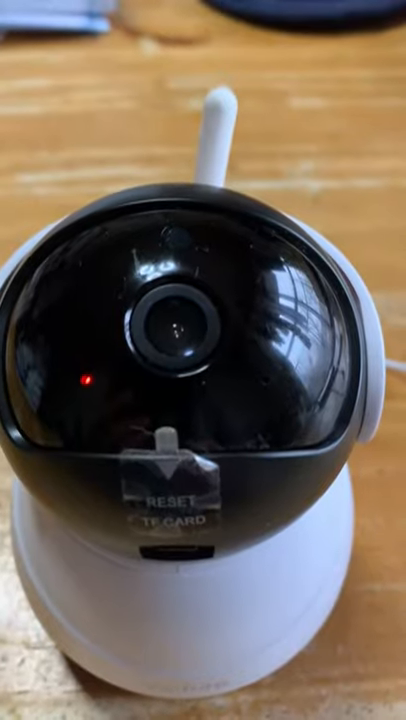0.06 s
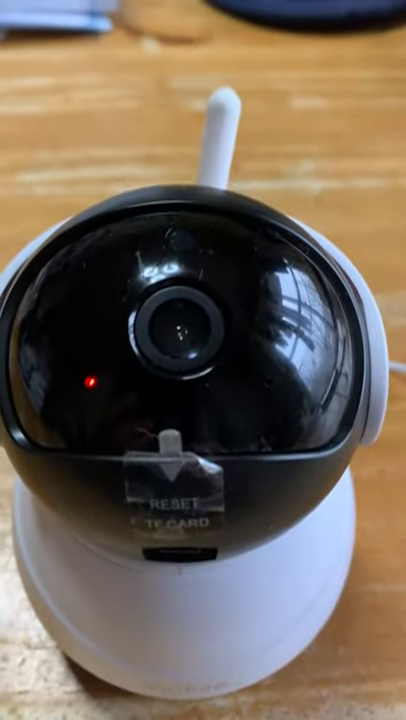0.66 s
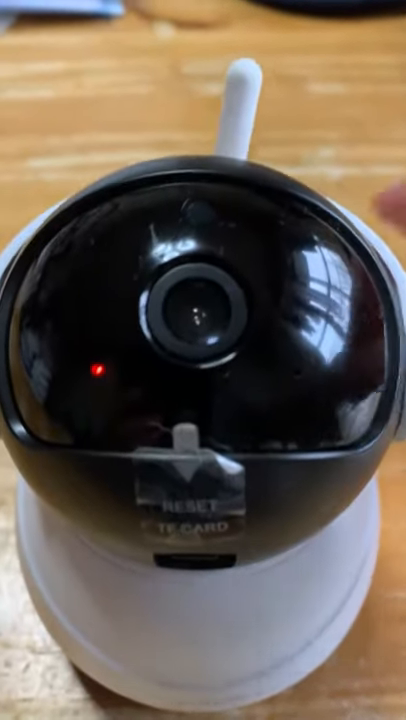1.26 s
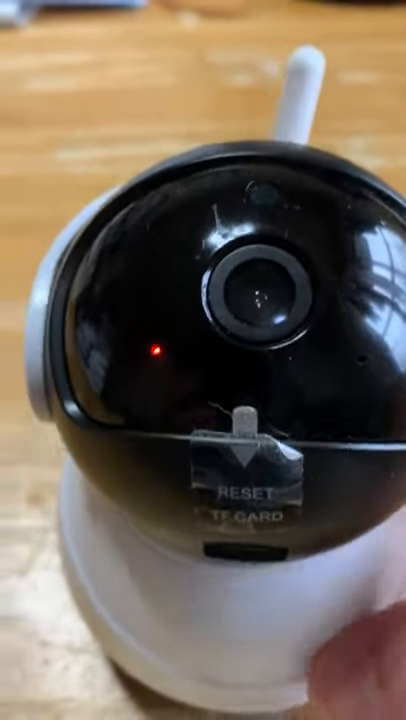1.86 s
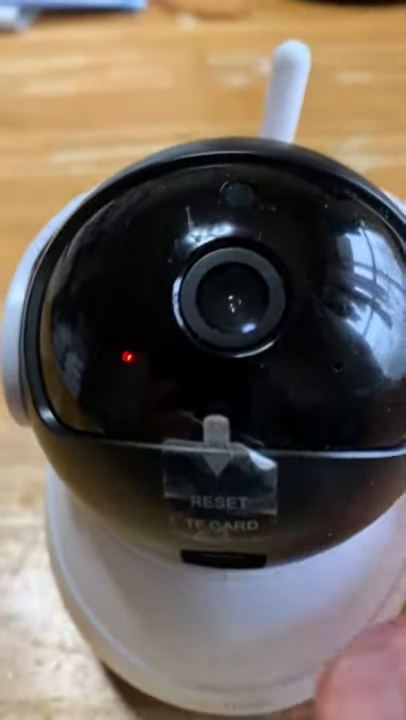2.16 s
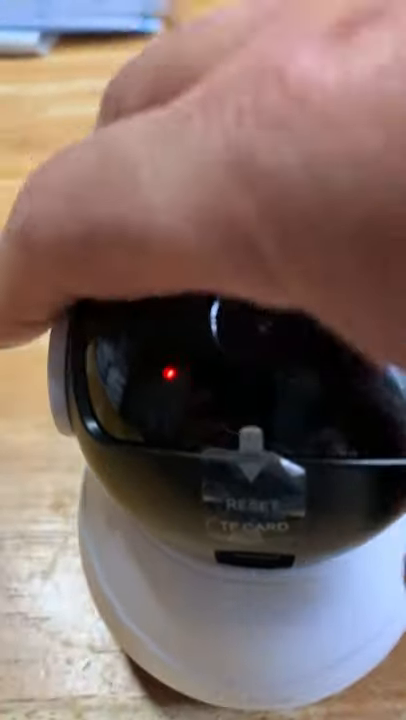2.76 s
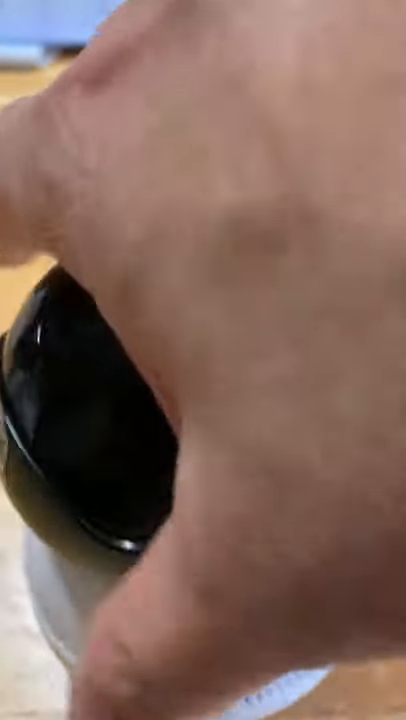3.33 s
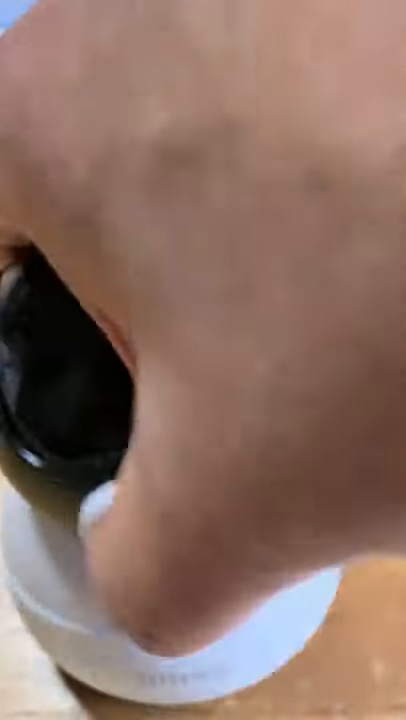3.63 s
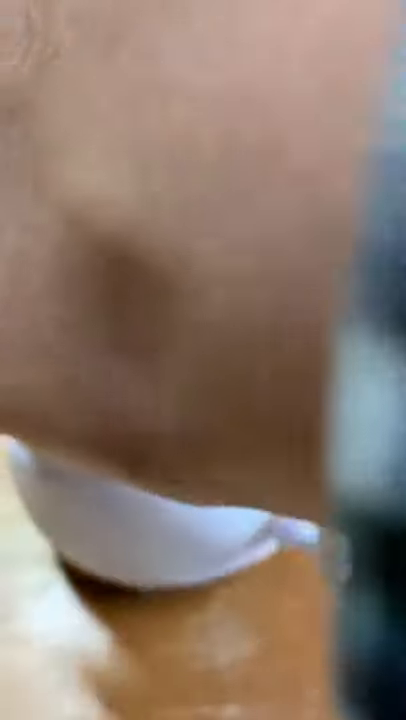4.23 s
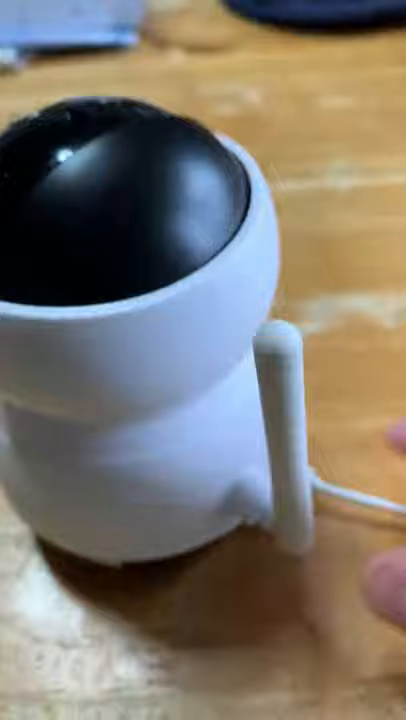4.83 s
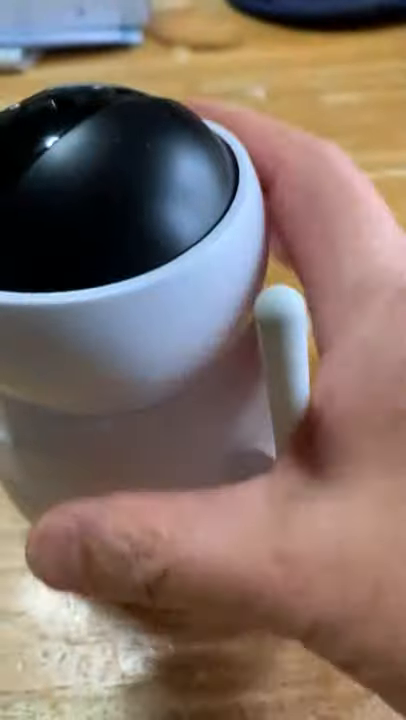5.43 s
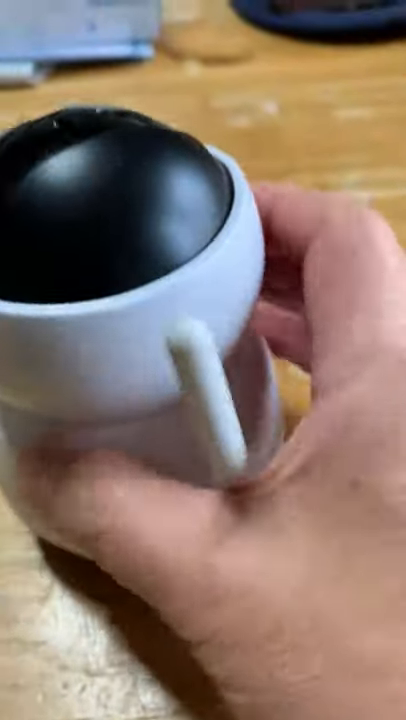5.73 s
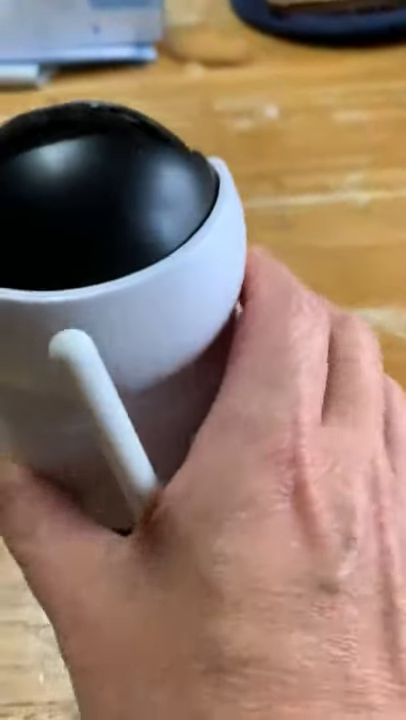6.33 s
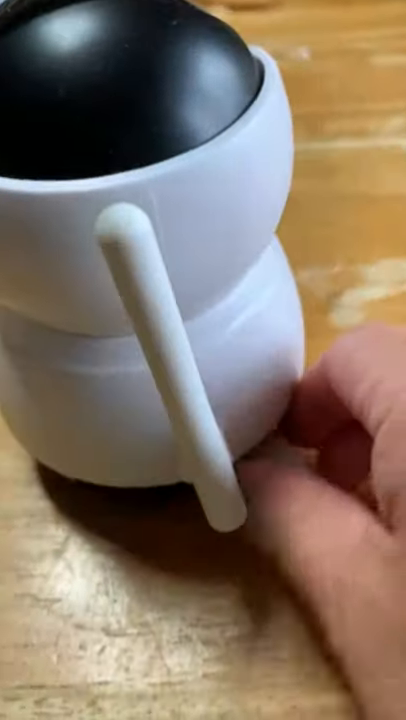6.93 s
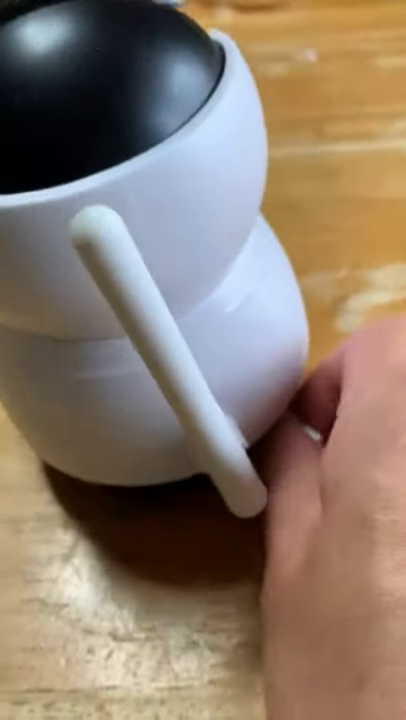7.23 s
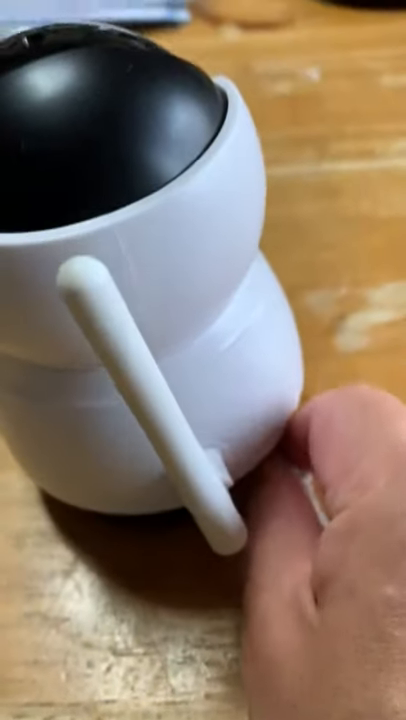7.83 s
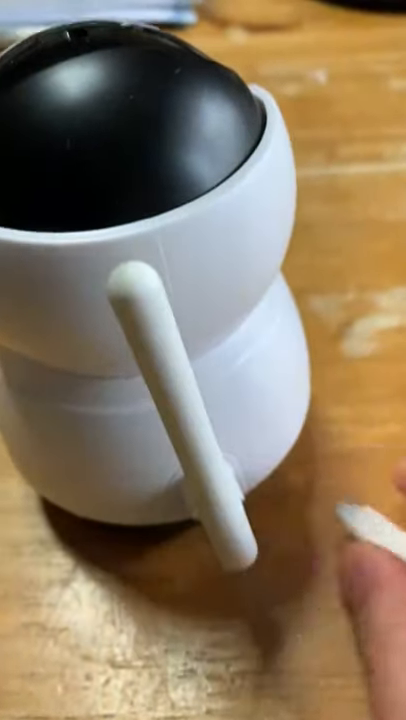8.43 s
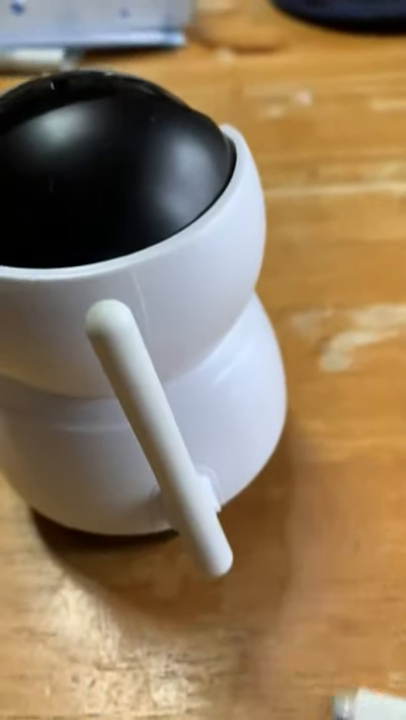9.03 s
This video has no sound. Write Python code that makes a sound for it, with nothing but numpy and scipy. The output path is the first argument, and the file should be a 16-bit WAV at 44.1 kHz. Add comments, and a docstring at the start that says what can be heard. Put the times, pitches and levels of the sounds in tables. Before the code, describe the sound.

In a quiet room, a hand turns a small plastic camera on a wooden table. Fingers rub and tap the hollow housing, which gives short scrapes and bright clicks, while its base knocks and thuds lightly on the wood. Near the end the cable plug is worked loose in a quick run of ticks and comes out with a sharp click, followed by one light tap. The microphone is close.

```python
"""Handling and unplugging a small camera

A quiet room, a wooden table, a two-port microphone close in. A hand turns a small plastic camera:
its head rasps round, its base rocks on the wood, fingers rub and tap the hollow housing, and the
tabletop thuds. Then the cable plug is worked loose in a run of ticks and leaves with a sharp click."""
import sys
import numpy as np
from scipy import signal
from scipy.fft import rfft, irfft
from scipy.io import wavfile

SR = 44100
rng = np.random.default_rng(int(sys.argv[2]) if len(sys.argv) > 2 else 0)


def store_pcm(level_fs):
    """Save levels as 16-bit WAV."""
    pcm = np.round(np.clip(level_fs, -1, 1) * 32767).astype(np.int16)
    wavfile.write(sys.argv[1], SR, np.atleast_2d(pcm).T)


N = 405225

# the base rocking on the wood: start_s, knock_db, thud_db
BASE_KNOCKS = [(0.151, -85, -49.5), (0.3, -88, -52.5), (0.972, -62, -51), (1.991, -48.5, -42),
               (3.103, -49, -39), (3.1449, -23.5, -35), (3.1646, -28, -44.5), (3.4002, -37, -31.5),
               (3.466, -53.5, -42), (3.643, -50, -44), (3.8886, -39, -31.5), (4.013, -38, -41),
               (4.3271, -40.5, -41.5), (4.416, -57, -42), (5.334, -44.5, -36), (5.5857, -32, -36),
               (5.616, -41.5, -32), (5.6725, -43.5, -41.5), (5.7155, -45, -36.5), (5.795, -43, -41.5),
               (5.817, -54, -30), (5.838, -55, -46), (5.9834, -31.5, -28), (6.0374, -39.5, -49),
               (6.048, -44, -34.5), (6.074, -51, -37.5), (6.088, -47.5, -41), (6.1735, -45.5, -40.5),
               (6.387, -49.5, -46), (6.465, -43, -34), (6.88, -59, -44.5), (7.2355, -40.5, -44.5),
               (7.39, -58.5, -43), (7.488, -46.5, -38.5), (8.122, -38, -26), (8.238, -70, -43.5),
               (9.081, -64.5, -45.5)]
# hard plastic parts meeting, and faint fingertip touches on the shell: start_s, knock_db, click_db, snap_db,
# part_ring_hz, edge_ping_hz
PLASTIC_CLICKS = [(1.5664, -47, -53, -41.5, 4900, 6300), (1.6197, -46, -52, -44.5, 4950, 7170),
                  (2.953, -57.5, -75, -55, 2120, 7060), (2.994, -67, -70, -63, 2100, 7700),
                  (3.004, -49.5, -54.5, -53, 1390, 7360), (3.147, -34, -40.5, -59, 1510, 7300),
                  (3.166, -45, -47, -62, 1550, 6600), (3.243, -59, -66, -50.5, 2110, 7470),
                  (3.477, -67, -77, -73, 2100, 8150), (3.2015, -49, -53.5, -41.5, 5000, 7530),
                  (3.529, -51, -47, -46, 2100, 8250), (3.5489, -57, -41.5, -38, 4000, 13100),
                  (3.955, -41.5, -41, -43, 1360, 11900), (4.27, -56.5, -60, -62.5, 2190, 8000),
                  (4.302, -54.5, -65, -67, 3940, 7500), (4.378, -56.5, -61, -61, 2130, 7360),
                  (5.1855, -53, -50.5, -44, 5200, 7970), (5.312, -72, -59, -54, 3550, 7680),
                  (5.3597, -47, -45, -58, 2090, 6670), (5.382, -58, -58, -62, 2170, 6900),
                  (5.412, -56.5, -70, -58.5, 3500, 6900), (5.479, -53, -49, -53, 2050, 7860),
                  (5.516, -49, -47.5, -72, 2050, 6000), (5.588, -45, -44.5, -60, 3610, 7900),
                  (5.6101, -35.5, -37.5, -45, 2116, 5900), (5.9135, -57, -43.5, -44.5, 2090, 5950),
                  (6.033, -43, -62, -65, 2000, 11600), (6.058, -51, -55, -43.5, 2380, 7500),
                  (6.3343, -46, -61.5, -61, 1430, 7360), (6.4454, -42.5, -53, -56, 2125, 6160),
                  (6.5338, -72, -63, -57.5, 1520, 6360), (7.2366, -48.5, -52.5, -78, 1410, 6000),
                  (7.417, -54, -63, -87, 1550, 6000), (7.479, -57.5, -56.5, -68, 2640, 7900),
                  (8.1225, -34, -41, -41.5, 2110, 6130), (8.132, -33.5, -38.5, -44, 3100, 7740),
                  (8.1411, -39, -44.5, -45.5, 2100, 8300)]
# short slides of base, fingers and plug: start_s, end_s, knock_db, click_db, snap_db, ring_hz
SLIDES = [(1.565, 1.62, -45, -55, -51, 660), (1.618, 1.643, -43.5, -56.5, -48, 1070),
          (1.642, 1.667, -51, -56, -51.5, 1060), (1.661, 1.693, -60, -61, -64, 1060),
          (1.851, 1.886, -50.5, -65.5, -62.5, 996), (1.943, 1.948, -54, -58, -61, 2390),
          (2.118, 2.173, -70, -62.5, -53.5, 9600), (2.675, 2.695, -64.5, -72, -64, 2150),
          (3.125, 3.156, -56, -53.5, -53, 2170), (3.2, 3.211, -58, -54, -45, 7670),
          (3.235, 3.297, -53, -64, -57, 720), (5.479, 5.502, -54, -52, -57.5, 2080),
          (5.603, 5.614, -38, -40.5, -66, 874), (5.916, 5.932, -55.5, -47.5, -71, 2620),
          (5.981, 6.08, -48.5, -53.5, -55.5, 2030), (6.828, 6.85, -49, -51.5, -51, 1370),
          (6.85, 6.885, -63, -58, -49, 12500), (6.959, 7.03, -85, -57, -51, 6500),
          (6.973, 6.995, -64, -52, -42, 7520), (7.147, 7.188, -64, -57.5, -54.5, 6400),
          (7.475, 7.517, -49.5, -59, -59.5, 960), (7.529, 7.708, -60, -67.5, -70, 1000),
          (7.733, 8.007, -65, -78, -97, 1710), (8.093, 8.12, -54, -54, -54, 2290),
          (8.111, 8.116, -29.5, -36, -42, 610), (8.126, 8.136, -34, -36, -44, 2154),
          (8.319, 8.467, -70.5, -64, -64, 1700), (9.051, 9.094, -55.5, -64.5, -89, 1523)]
# dry skin or a plastic edge dragging: start_s, end_s, level_db, pitch_hz
DRAG_SQUEAKS = [(1.569, 1.6, -46.5, 5930), (1.572, 1.598, -53, 7200), (1.564, 1.665, -62, 12800),
                (1.617, 1.628, -49, 6100), (1.646, 1.671, -46.5, 5630), (1.66, 1.668, -44, 7200),
                (3.133, 3.147, -45, 7150), (6.975, 6.987, -34, 7200), (6.987, 7, -44, 6680),
                (7.15, 7.185, -57, 7300)]
# the hand bumping the shell: start_s, level_db, pitch_hz
HAND_BUMPS = [(1.639, -46, 240), (4.167, -46.5, 190), (6.876, -44, 282), (8.122, -37.5, 247)]
# the plug working loose: start_s, knock_db, click_db, snap_db, knock_hz, click_hz, slip_s
PLUG_SLIPS = [(7.595, -42.5, -45, -46.5, 970, 2340, 0.0038), (7.6307, -42.5, -60.5, -70, 975, 1550, 0.002),
              (7.6366, -43.5, -44, -59, 633, 1570, 0.0043), (7.666, -42.5, -46.5, -52, 991, 1770, .004),
              (7.733, -40.5, -45, -46, 976, 1380, 0.0025), (7.7617, -41, -46.5, -54.5, 695, 1580, 0.0017),
              (7.8097, -42, -43, -51.5, 617, 1500, 0.0019), (7.8389, -41.5, -45, -52.5, 553, 1670, 0.0023),
              (7.8631, -41, -43.5, -50.5, 575, 1830, 0.0014),
              (7.902, -43.5, -41.5, -53.5, 613, 1760, 0.00065),
              (7.9464, -41, -43, -47.5, 587, 1860, 0.0011), (7.998, -41, -42, -47, 990, 1666, 0.00055)]
# the loose cable and its plug tapping: start_s, level_db, pitch_hz, top_hz
LOOSE_CABLE_TAPS = [(4.977, -45.5, 3830, 5200), (8.597, -39, 1620, 4040)]
# the hand holding and turning the housing: start_s, end_s, relative_db
HAND_TURNS = [(1.83, 2.17, -67), (2.68, 2.98, -68), (3.0, 3.37, -57), (3.42, 4.05, -62), (4.08, 4.45, -64),
              (5.15, 5.46, -62), (5.49, 5.84, -59), (5.93, 6.16, -63), (6.24, 6.5, -56.5),
              (6.55, 7.44, -64.5), (7.48, 8.05, -66.5), (8.2, 8.55, -64)]
# skin swiping the plastic: start_s, end_s, relative_hiss_db, relative_sheen_db, sheen_hz
SKIN_SWIPES = [(0.49, 0.53, -79.5, -92, 6500), (1.84, 1.994, -67.5, -85, 8950),
               (1.993, 2.161, -62.5, -64, 10700), (2.48, 2.524, -78, -82, 8500),
               (2.664, 2.767, -64.5, -64.5, 9700), (2.76, 2.808, -64.5, -59.5, 12000),
               (2.815, 2.907, -62, -62, 10300), (2.922, 3.14, -61, -71, 9700),
               (3.173, 3.344, -66, -68, 9450), (3.56, 3.62, -65.5, -81, 12200),
               (3.629, 3.715, -66, -71, 9500), (3.731, 3.93, -100.5, -72, 6760),
               (3.972, 4.053, -76, -64, 8400), (4.079, 4.24, -71.5, -58.5, 8460),
               (4.114, 4.19, -74, -64, 11200), (4.303, 4.418, -70, -73, 8600),
               (5.144, 5.263, -66.5, -80, 10000), (5.515, 5.587, -59, -60.5, 10400),
               (5.717, 5.799, -54, -58, 12100), (5.95, 6.042, -54, -55.5, 11100),
               (6.101, 6.178, -71, -69.5, 7740), (6.226, 6.327, -61.5, -65, 10400),
               (6.378, 6.452, -65, -67, 9700), (6.524, 6.593, -65, -63, 11000),
               (6.748, 6.772, -62, -63, 6860), (7.025, 7.094, -66, -69, 7650),
               (7.239, 7.445, -68.5, -64, 11100), (7.515, 7.554, -60, -80, 9000),
               (8.176, 8.227, -68, -64.5, 6130), (8.276, 8.472, -64.5, -67.5, 9900),
               (9.068, 9.102, -77, -79, 8300)]
# the echo off the cupped palm, its delay following the gap: time_s, delay_s
PALM_DELAYS = [(1.9, 0.0005), (2.7, 0.00049), (3.05, 0.0005), (3.8, 0.00053), (4.2, 0.00051),
               (5.5, 0.00048), (6.3, 0.000489), (7.3, 0.00048), (8.4, 0.0006)]

# modes of the hollow housing and its base: pitch_hz, relative_db, t60_s
HOUSING_MODES = [(279.3, -11, 0.18), (344.6, -14, 0.12), (572.7, -5.5, 0.074), (610.4, 4.5, 0.039),
                 (711.6, -4, 0.068), (846, -12, 0.061), (933, -4.5, 0.045), (1047, -5.5, 0.042),
                 (1221, -10, 0.05), (1473, -4.5, 0.027), (1670, -8, 0.0081), (2050, -9, 0.045),
                 (2200, -8, 0.035), (2412, -7, 0.025), (2660, -11.5, 0.039), (3107, -6, 0.027),
                 (3840, -10.5, 0.018), (4540, 8, 0.0051), (5390, -4, 0.015), (5804, -5, 0.025),
                 (6130, -2.5, 0.016), (7080, 2.5, 0.012), (7470, 0, 0.023), (7990, -0.5, 0.014),
                 (9180, -14, 0.0077), (12200, -17.5, .01), (12500, -12.5, 0.018)]
# modes of the tabletop: pitch_hz, relative_db, t60_s
TABLETOP_MODES = [(45.3, -23, 0.56), (81.8, -4, 0.18), (90.8, -2, 0.15), (137, 0, 0.067),
                  (193, -8.5, 0.078), (275.2, -18.5, .12)]
# modes of the socket and base: pitch_hz, relative_db, t60_s
SOCKET_MODES = [(330, -9, 0.03), (594, 2, 0.052), (645, -3.5, .04), (883, -11.5, 0.042), (2072, -9.5, .05),
                (2150, -11.5, 0.045), (2470, -12.5, .04), (3090, -13.5, 0.04), (4330, -8, 0.031),
                (6160, -23.5, 0.09)]
# the housing's knock, click and snap bands, a row each: low_hz, high_hz
HOUSING_BANDS = [(280, 1700), (1450, 5000), (5000, 13000)]
# a soft contact loses its highs: click_minus_knock_db, knock_top_hz
CONTACT_SOFTNESS = [(-24, 1400), (-18.5, 1430), (-2, 2770), (20, 5100)]
# spectrum of the rubbed housing: frequency_hz, relative_db
RUB_SPECTRUM = [(150, -2), (280, 0), (420, -6), (620, 0), (820, -2), (1020, -1), (1700, -13.5), (1900, -13),
                (2170, -13), (2500, -13), (4000, -16), (6000, -45.5)]
# spectrum of sliding skin: frequency_hz, relative_db
HISS_SPECTRUM = [(1500, -13.5), (2200, 0), (2900, 0.5), (3900, -3.5), (4700, 2), (6000, 2.5), (7500, 6.5),
                 (9000, 0.5), (10500, -16.5), (13000, -42.5)]
# spectrum of the skin's finest grain, for a sheen_hz of 9900: frequency_hz, relative_db
SHEEN_SPECTRUM = [(6000, -23), (9000, 4.5), (10400, 2.5), (11800, -15), (14500, -32)]
# spectrum of the quiet room: frequency_hz, relative_db
ROOM_SPECTRUM = [(20, -54), (27, -31), (34, -9), (45, -5.5), (85, -1.5), (130, -8.5), (250, -16),
                 (400, -28.5), (600, -28), (900, -23.5), (1400, -26.5), (1750, -35.5), (2000, -33),
                 (2600, -45), (4000, -42), (4900, -46.5), (6000, -46), (8000, -46), (12000, -64)]
# how alike diffuse sound is at the two ports: frequency_hz, correlation
PORT_LIKENESS = [(60, 0.99), (250, 0.59), (630, 0), (1400, 0.7), (3000, 0), (6500, 1), (14000, 0.3)]
# the microphone's left port against its right: frequency_hz, left_lead_rad, left_minus_right_db
PORT_RESPONSE = [(30, -0.5, 1.5), (100, 0.29, -1.5), (513, 0.68, -2), (1030, 0.81, -1.5), (2230, 1, -2.5),
                 (3890, 1, -1), (4540, 2.5, -4), (4720, 4, -5), (6700, 6, 2), (7700, 5.5, -0.5),
                 (10630, 8.5, 0), (14900, 5.5, -0.5)]

SWIPE_ATTACK_S, SWIPE_RELEASE_S = 0.032, 0.036


def base_knocks(rim_hz=897, rim_scatter=0.15, top_hz=2400):
    """The base drops on the wood: a rap of its rim, never quite at one pitch, a dull knock and a thud."""
    out = np.zeros(N)
    wave = from_db(-5.5) * table_wave(start_hz=2882, spread_s=0.004656, t60=0.11)
    for start, knock_db, thud_db in BASE_KNOCKS:
        rap_hz = rim_hz * np.exp(rim_scatter * rng.standard_normal())
        rap = from_db(-10.5) * local_ring(rap_hz, t60=0.015, build_cycles=1.3)
        add(out, start, contact(thud_db, knock_db, knock_db - 22, knock_db - 40, wave + rap, ring=wave))
    return low_pass(out, top_hz)


def plastic_clicks(thud_over_knock_db=2.5):
    """Plastic meets plastic, or a fingertip touches the shell: bright clicks that shake the table in step with
    their knock."""
    out = np.zeros(N)
    wave = from_db(-8) * table_wave(start_hz=2950, spread_s=0.00448, t60=0.16)
    for start, knock_db, click_db, snap_db, ring_hz, ping_hz in PLASTIC_CLICKS:
        ring = from_db(-7.5) * local_ring(ring_hz, t60=0.019, build_cycles=3.4)
        ping = from_db(-6) * local_ring(ping_hz, t60=0.014, build_cycles=9.6)
        thud_db = knock_db + thud_over_knock_db
        add(out, start, contact(thud_db, knock_db, click_db, snap_db, wave, ring, ping))
    return out


def plug_ticks(thud_over_knock_db=4.5):
    """The plug sticks and slips: each slip lets go with a tick and ends in a softer catch."""
    out = np.zeros(N)
    wave = from_db(-0.5) * table_wave(start_hz=2424, spread_s=0.00551, t60=0.062)
    upper_bands = (HOUSING_BANDS[1][0], HOUSING_BANDS[2][1])
    for start, knock_db, click_db, snap_db, knock_hz, click_hz, slip_s in PLUG_SLIPS:
        body = wave + from_db(-2.5) * local_ring(knock_hz, t60=0.027, build_cycles=2.1)
        ring = wave + from_db(-2.5) * local_ring(click_hz, t60=0.0097, build_cycles=1.0)
        add(out, start, contact(knock_db + thud_over_knock_db, knock_db, click_db, snap_db, body, ring))
        catch = unit_blow(band(housing_answer(), upper_bands))
        add(out, start + slip_s, from_db(click_db - 5) * catch)
    return out


def unplug(start_s=8.1185):
    """The plug comes free with a dry crack, the latch whips and the socket springs back, ringing."""
    out, t = np.zeros(N), np.arange(SR // 4) / SR
    crack = band(rng.standard_normal(len(t)) * decay(t, t60=0.02), [2800, 9500])
    latch = local_ring(hz=2420, t60=0.006, build_cycles=2.7)
    socket = ringing(SOCKET_MODES, t, scatter_db=0.5, build_cycles=1.0)
    add(out, start_s, from_db(-30) * unit_blow(crack))
    add(out, start_s, from_db(-24.5) * latch)
    add(out, start_s, from_db(-22.5) * unit_blow(socket))
    return out


def scrapes(judder_db=1.0, swell_power=0.085):
    """A slide is a juddering run of slips into the housing and the rubbed spot, swelling and easing."""
    out = np.zeros(N)
    for start, end, *levels_db, ring_hz in SLIDES:
        size = max(round((end - start) * SR), 100)
        catches = slips(SR // 2, per_s=1500, uneven_db=3.0)
        catches *= from_db(-judder_db * drift(per_s=220, size=SR // 2))
        answer = unit_blow(housing_answer())
        spot = from_db(-8.5) * local_ring(ring_hz, t60=0.017, build_cycles=0.86)
        rasp = signal.fftconvolve(catches[:size] * np.hanning(size) ** swell_power, answer + spot)
        for edges, db in zip(HOUSING_BANDS, levels_db):
            part = band(band(rasp, edges), edges)
            mean_power = (np.sum(part ** 2) + 1e-20) / size
            add(out, start, from_db(db) * part / np.sqrt(mean_power))
    return out


def squeaks(edge_ratio=1.11):
    """Quick, uneven slips keep one high resonance ringing."""
    out = np.zeros(N)
    for start, end, db, hz in DRAG_SQUEAKS:
        gain = stroke(end - start, attack_s=0.0015, release_s=0.0047)
        grain = band(slips(SR // 2, per_s=2200, uneven_db=1.5), [hz / edge_ratio, hz * edge_ratio])
        add(out, start, from_db(db) * gain * unit_rms(grain[:len(gain)]))
    return out


def hand_bumps():
    """Soft flesh only wakes the lowest ring of the shell, and slowly."""
    out = np.zeros(N)
    for start, db, hz in HAND_BUMPS:
        add(out, start, from_db(db) * local_ring(hz, t60=0.072, build_cycles=1.3))
    return out


def cable_taps(lead_in_s=0.016, low_hz=600):
    """Each tap has a faint, short noisy lead-in, then a dry crack with a very short ring."""
    out, t = np.zeros(N), np.arange(SR // 8) / SR
    for start, db, hz, top_hz in LOOSE_CABLE_TAPS:
        lead_in = band(rng.standard_normal(len(t)) * decay(t, t60=0.08), [low_hz, top_hz])
        crack = band(rng.standard_normal(len(t)) * decay(t, t60=0.04), [low_hz, top_hz])
        ring = from_db(-6) * local_ring(hz, t60=0.006, build_cycles=1.5)
        add(out, start - lead_in_s, from_db(db - 18.5) * unit_blow(lead_in))
        add(out, start, from_db(db) * unit_blow(crack + ring))
    return low_pass(out, hz=7500)


def finger_rub():
    """Fingers slide with an unsteady grip: a hollow rub from the housing; hiss, grit, sheen from skin."""
    hold = strokes(HAND_TURNS, attack_s=0.019, release_s=0.086)
    swipe = strokes(SKIN_SWIPES, SWIPE_ATTACK_S, SWIPE_RELEASE_S)
    hiss = np.hypot(swipe, from_db(-16) * hold)   # a holding hand hisses faintly too
    rub = np.array([from_db(-3) * skin_sheen() + hiss * skin_grit() for _ in range(2)])
    for gain, db, spectrum in [(hold, -2, RUB_SPECTRUM), (hiss, -1, HISS_SPECTRUM)]:
        grain = np.array([slips(N, per_s=6000, uneven_db=2.5) for _ in range(2)])
        rub += gain * from_db(db) * coloured(grain, spectrum)
    stutter = from_db(2 * drift(per_s=170))
    grip = from_db(2 * drift(per_s=38))
    return diffuse_pair(*palm_echo(cupped_hand(rub * stutter * grip)))


def skin_sheen(reference_hz=9900):
    """The finest grain of each swipe lies in a high band, pitched by how the skin meets the plastic."""
    out, hz = np.zeros(N), np.fft.rfftfreq(SR, 1 / SR)
    for start, end, _, db, sheen_hz in SKIN_SWIPES:
        gain = stroke(end - start, SWIPE_ATTACK_S, SWIPE_RELEASE_S)
        colour = from_db(at_hz(SHEEN_SPECTRUM, hz * reference_hz / sheen_hz))
        catches = slips(SR, per_s=11000, uneven_db=5.5)
        grain = unit_rms(irfft(rfft(catches) * colour, SR))
        add(out, start, from_db(db) * gain * grain[:len(gain)])
    return out


def skin_grit():
    """Ridges of the skin catch one by one and make the housing crackle."""
    catches = slips(N, per_s=260, uneven_db=4.5)
    crackle = signal.fftconvolve(catches, housing_answer())[:N]
    return from_db(-12.5) * unit_rms(band(crackle, [1900, 10500]))


def cupped_hand(x, waver_db=2.2):
    """The cupped hand keeps changing shape, so each part of the spectrum swells and fades by itself."""
    hz, centres_hz = np.fft.rfftfreq(N, 1 / SR), np.geomspace(900, 13000, 12)
    spectrum, out = rfft(x), 0
    for one_band in np.eye(len(centres_hz)):
        share = np.interp(hz, centres_hz, one_band)
        out = out + irfft(spectrum * share, N) * from_db(waver_db * drift(per_s=14))
    return out


def palm_echo(pair, echo_db=-8.5):
    """The echo off the palm makes the rub hollow, with peaks that glide as the hand moves."""
    n = np.arange(N)
    delay_s = np.interp(n / SR, *np.transpose(PALM_DELAYS))
    echo = np.array([np.interp(n - SR * delay_s, n, x) for x in pair])
    return pair + from_db(echo_db) * echo


def contact(thud_db, knock_db, click_db, snap_db, body, ring, ping=0):
    """A contact shakes the tabletop and rings the housing in three bands, brighter the harder it is."""
    t = np.arange(SR // 4) / SR
    out = from_db(thud_db) * unit_blow(ringing(TABLETOP_MODES, t, scatter_db=4.0, build_cycles=1.5))
    answer = unit_blow(housing_answer())
    knock_top_hz = np.interp(click_db - knock_db, *np.transpose(CONTACT_SOFTNESS))
    bands = [(HOUSING_BANDS[0][0], knock_top_hz), *HOUSING_BANDS[1:]]
    for part, edges, db in zip((body, ring, ping), bands, (knock_db, click_db, snap_db)):
        add(out, 0, from_db(db) * unit_blow(band(band(answer + part, edges), edges)))
    return out


def housing_answer(detune=0.015):
    """One touch on the housing: its modes, shifted by the grip, a crack and a faint rattle from inside."""
    t = np.arange(SR // 8) / SR
    crack = from_db(5) * decay(t, t60=0.017)
    rattle = from_db(-12) * decay(t, t60=0.082)
    grip_shift = 1 + detune * rng.standard_normal()
    modes = ringing(HOUSING_MODES, t * grip_shift, scatter_db=3.0, build_cycles=0.75)
    return modes + (crack + rattle) * rng.standard_normal(len(t))


def table_wave(start_hz, spread_s, t60):
    """A bending wave crosses the tabletop: highs travel faster, so it arrives as a falling chirp."""
    t = np.arange(SR // 8) / SR
    cycles = start_hz * spread_s * t / (t + spread_s)
    return unit_blow(decay(t, t60) * np.sin(2 * np.pi * cycles))


def local_ring(hz, t60, build_cycles):
    """The touched spot rings briefly at a pitch of its own."""
    t = np.arange(SR // 8) / SR
    return unit_blow(ringing([(hz, 0, t60)], t, 0, build_cycles))


def ringing(modes, t, scatter_db, build_cycles):
    """Modes struck with new strengths; each builds up over build_cycles, so the lows come last."""
    hz, db, t60 = np.array(modes).T[:, :, None]
    strength = from_db(db + scatter_db * rng.standard_normal(hz.shape))
    swell = 1 - np.exp(-(hz * t / build_cycles) ** 2)
    tones = np.sin(2 * np.pi * (hz * t + rng.random(hz.shape)))
    return np.sum(strength * swell * decay(t, t60) * tones, axis=0)


def slips(size, per_s, uneven_db):
    """Friction as tiny catches of uneven strength at random moments."""
    caught = rng.random(size) < per_s / SR
    strength = from_db(uneven_db * np.minimum(rng.exponential(1, size), 4))
    return caught * strength * rng.choice([-1, 1], size)


def strokes(rows, attack_s, release_s):
    """Gain of a run of hand movements, each at its own level."""
    gain = np.zeros(N)
    for start, end, db, *_ in rows:
        add(gain, start, from_db(db) * stroke(end - start, attack_s, release_s))
    return gain


def stroke(length_s, attack_s, release_s, swell_db=1.5):
    """Gain of one hand movement: it sets in, swells as the hand gathers speed midway, and lets go."""
    length_s = max(length_s, attack_s)
    total_s = length_s + release_s
    t = np.arange(int(total_s * SR)) / SR
    speed = np.sin(np.pi * t / total_s)
    touch = np.interp(t, [0, attack_s, length_s, total_s], [0, 1, 1, 0])
    return touch * from_db(swell_db * (speed - speed.mean()))


def room_tail(x, level_db=-16.5, t60=0.22, build_s=0.0013):
    """The walls answer with a diffuse tail, weak this close in and different at each port."""
    t = np.arange(SR // 2) / SR
    tail = band(rng.standard_normal((2, len(t))), [180, 7500])
    tail *= decay(t, t60) * (1 - np.exp(-t / build_s))
    tail /= np.sqrt(np.sum(tail ** 2) / 2)
    return from_db(level_db) * signal.fftconvolve(x[None], tail, axes=1)[:, :N]


def room_tone(level_db=-58.5, rumble_top_hz=450):
    """Faint air of a quiet room over a low rumble, both wavering slightly."""
    tone = from_db(level_db) * coloured(diffuse_pair(*rng.standard_normal((2, N))), ROOM_SPECTRUM)
    rumble = signal.sosfiltfilt(signal.butter(2, rumble_top_hz, fs=SR, output="sos"), tone)
    air = (tone - rumble) * from_db(0.8 * drift(per_s=7))
    return air + rumble * from_db(1.5 * drift(per_s=14))


def at_ports(x):
    """Sound reaches the microphone's two ports with a small lead and level difference."""
    hz = np.fft.rfftfreq(N, 1 / SR)
    lead_rad, balance_db = at_hz(PORT_RESPONSE, hz), at_hz(PORT_RESPONSE, hz, column=2)
    left = from_db(balance_db / 2)
    right = from_db(-balance_db / 2) * np.exp(-1j * lead_rad)
    return irfft(rfft(x) * np.array([left, right]), N)


def diffuse_pair(a, b):
    """Two unrelated sounds become a diffuse stereo pair."""
    alike = np.clip(at_hz(PORT_LIKENESS, np.fft.rfftfreq(N, 1 / SR)), 0, 1)
    mid, side = np.sqrt(1 + alike) * rfft(a), np.sqrt(1 - alike) * rfft(b)
    return irfft(np.array([mid + side, mid - side]), N)


def coloured(x, spectrum):
    """Give a scene-long sound a spectrum, at rms 1."""
    gain = from_db(at_hz(spectrum, np.fft.rfftfreq(N, 1 / SR)))
    return unit_rms(irfft(rfft(x) * gain, N))


def drift(per_s, size=N):
    """A random wander through per_s points a second, each of spread 1."""
    knots = rng.standard_normal(4000)
    return np.interp(np.arange(size) * per_s / SR, np.arange(len(knots)), knots)


def at_hz(points, hz, column=1):
    """Read one column of a table on a log-frequency axis."""
    points = np.array(points)
    return np.interp(np.log(hz + 1), np.log(points[:, 0]), points[:, column])


def band(x, edges_hz):
    """Causal band-pass."""
    return signal.sosfilt(signal.butter(2, edges_hz, "band", fs=SR, output="sos"), x)


def low_pass(x, hz):
    """Causal low-pass."""
    return signal.sosfilt(signal.butter(4, hz, fs=SR, output="sos"), x)


def from_db(db):
    """Decibels to gain."""
    return 10 ** (np.asarray(db) / 20)


def decay(t, t60):
    """Gain that falls 60 dB in t60 seconds."""
    return from_db(-60 * t / t60)


def unit_rms(x):
    """Scale to rms 1."""
    return x / np.sqrt(np.mean(x ** 2) + 1e-20)


def unit_blow(x):
    """Scale a blow to the energy of 10 ms at rms 1."""
    return x / np.sqrt(np.sum(x ** 2) / (0.01 * SR) + 1e-20)


def add(track, start_s, sound):
    """Mix a sound into a track from start_s on."""
    start = max(round(start_s * SR), 0)
    track[start:start + len(sound)] += sound[:len(track) - start]


def scene():
    """Camera and fingers close to the microphone, the quiet room behind them."""
    camera = base_knocks() + plastic_clicks() + hand_bumps() + plug_ticks()
    camera = camera + cable_taps() + scrapes() + squeaks() + unplug()
    return at_ports(camera + finger_rub() + room_tone()) + room_tail(camera)


def record(dry, cutoff_hz=13950):
    """The top of the treble is cut steeply."""
    return signal.sosfilt(signal.ellip(10, 0.2, 80, cutoff_hz, fs=SR, output="sos"), dry)


dry = scene()
out = record(dry)
store_pcm(out)
```